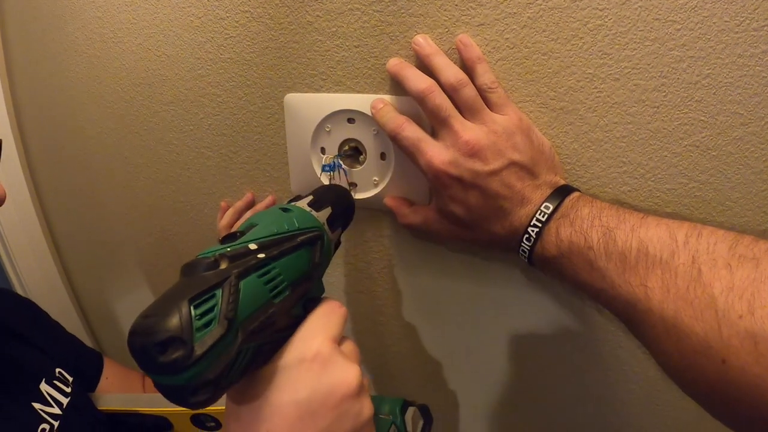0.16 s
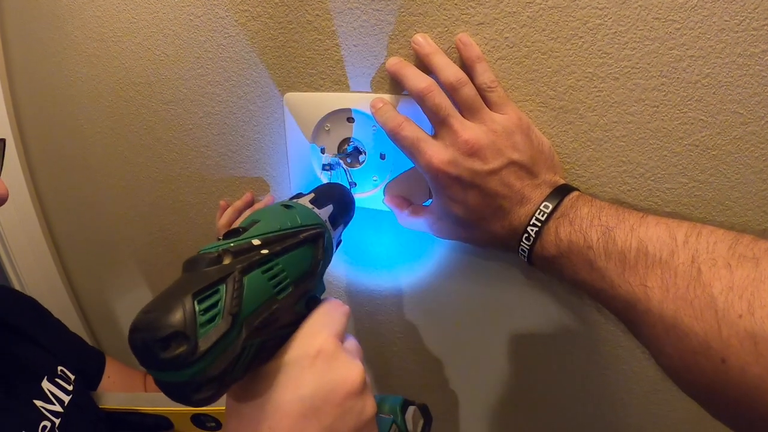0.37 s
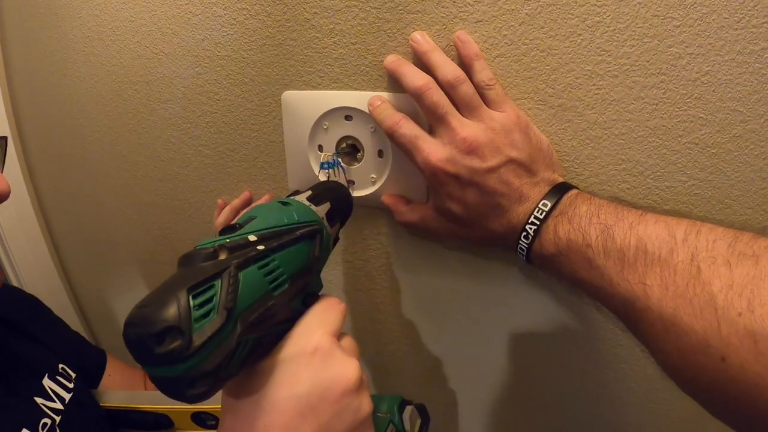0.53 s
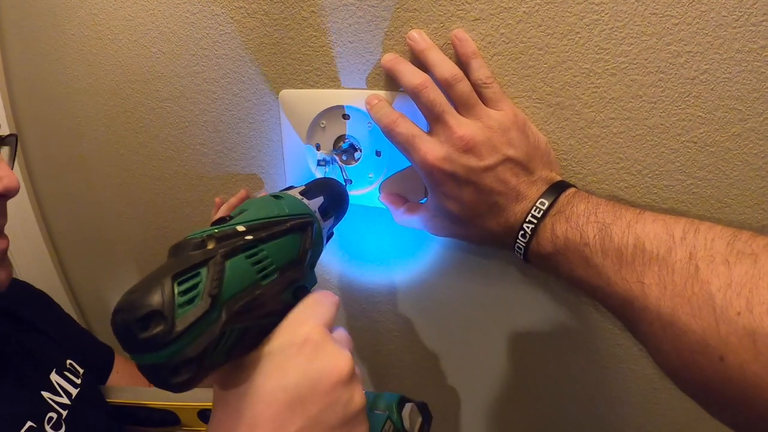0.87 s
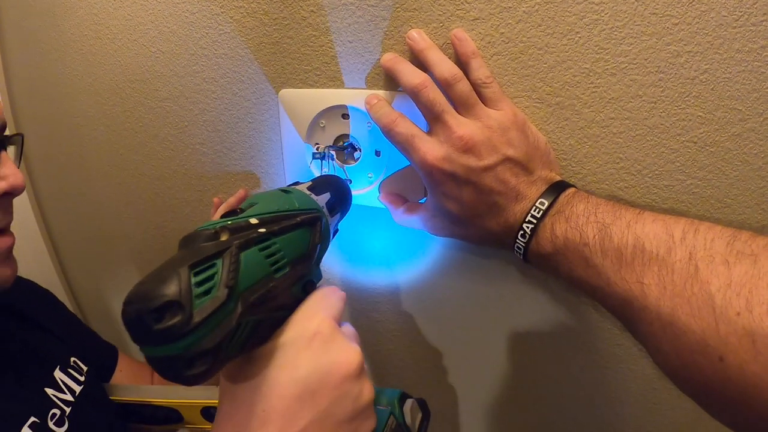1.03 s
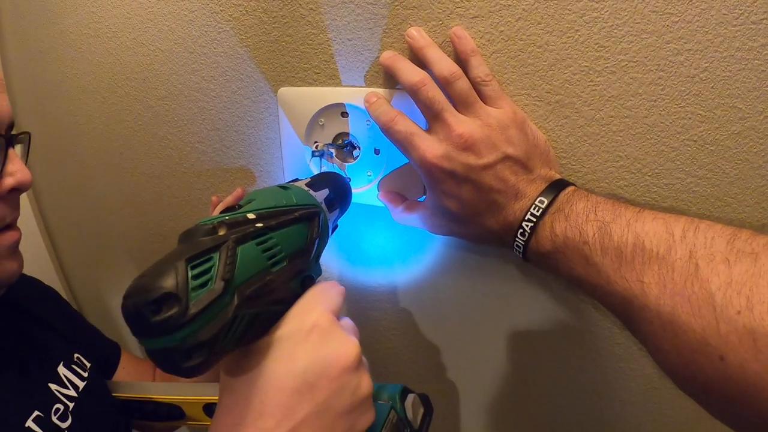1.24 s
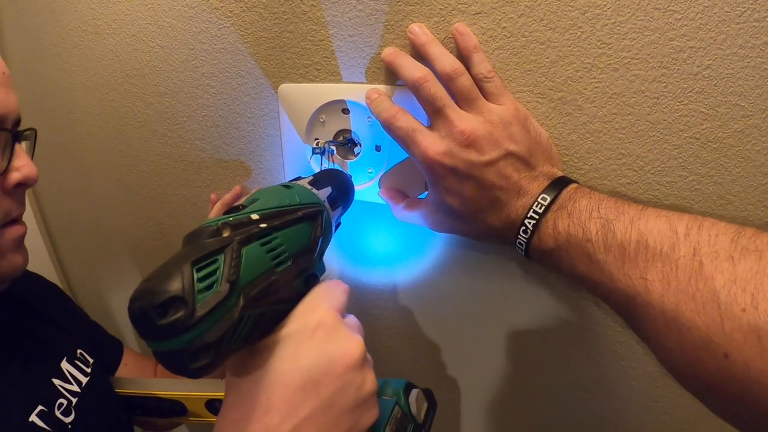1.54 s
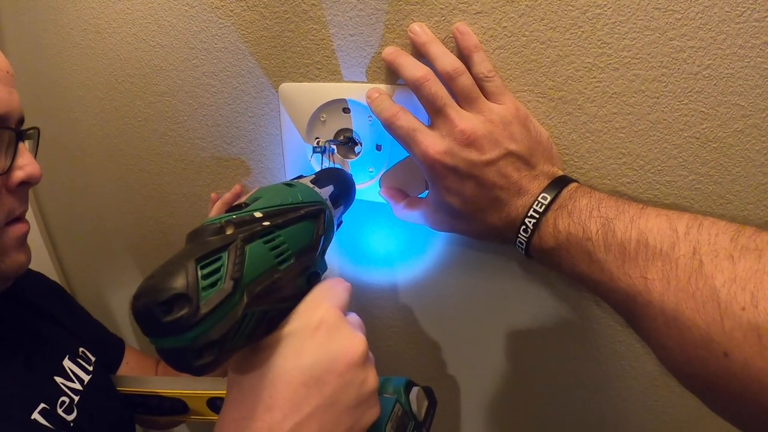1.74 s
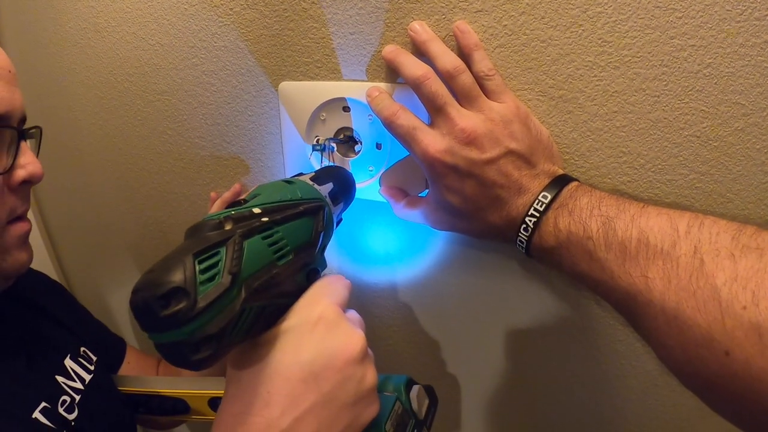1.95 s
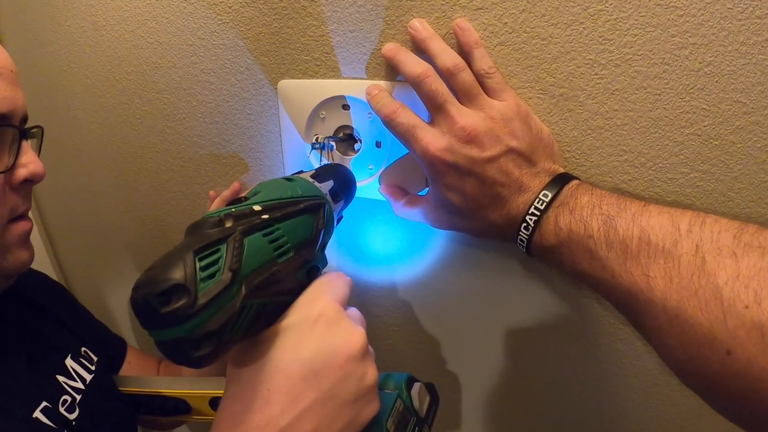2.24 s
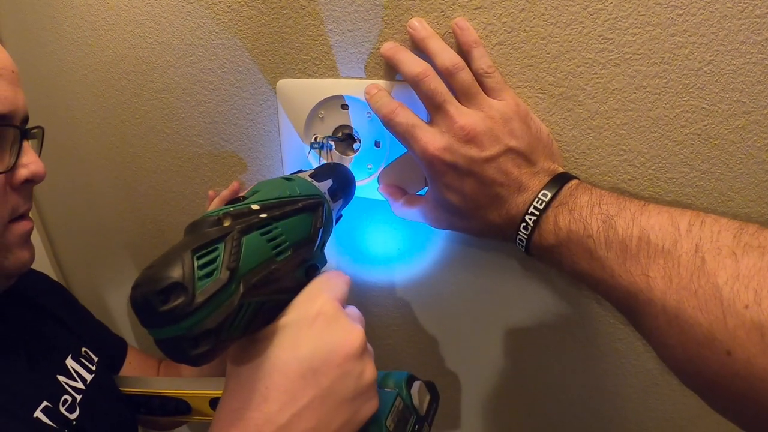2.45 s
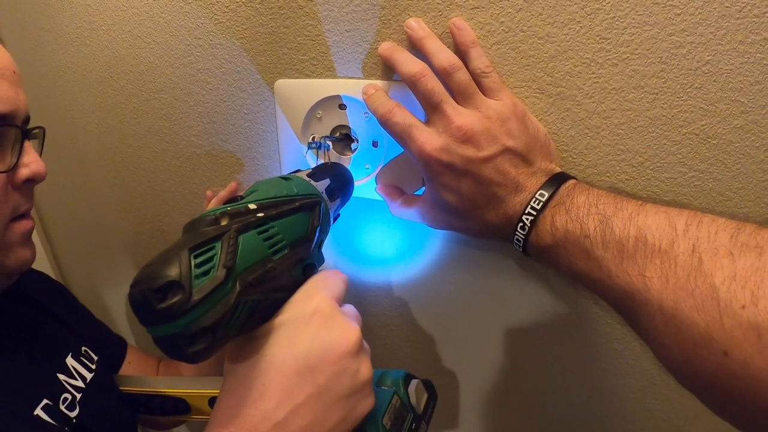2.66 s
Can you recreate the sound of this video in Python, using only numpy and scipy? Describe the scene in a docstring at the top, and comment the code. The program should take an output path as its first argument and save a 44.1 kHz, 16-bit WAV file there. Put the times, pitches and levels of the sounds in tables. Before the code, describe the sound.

Cordless drill whirrs briefly, crawls with knocking gears, then drives a screw at full speed.

```python
"""First comes the short whirr of a cordless drill, braked at once, in a small room.
A second pull lets the motor crawl: the speed control whistles, the gears knock once a turn and the
hollow wall booms. A third spins it up to full speed and drives a screw into a wall fixture.
The shaft hums, the gears rattle once a turn, the brushes hiss, and the even overtones grow
as the screw bites."""
import sys
import numpy as np
from scipy import signal
from scipy.fft import rfft, irfft, next_fast_len
from scipy.io import wavfile
from scipy.ndimage import map_coordinates

SR = 44100
rng = np.random.default_rng(int(sys.argv[2]) if len(sys.argv) > 2 else 0)


def to_wav(sig):
    """Store sig (one row per channel, or 1-D mono) as 16-bit WAV at the path in sys.argv[1].

    Samples outside -1..1 are clipped; the rate is SR.
    """
    pcm = np.clip(np.atleast_2d(sig), -1, 1) * 32767
    pcm = np.round(pcm).astype(np.int16)
    wavfile.write(sys.argv[1], SR, pcm.T)  # frames by channels


N = 123479


def amp(db):
    """Decibels to gain."""
    return 10 ** (np.asarray(db) / 20)


def unit(x):
    """Scale to rms 1."""
    return x / np.sqrt(np.mean(x ** 2) + 1e-20)


def along(points, hz):
    """Read (frequency, value) points on a log axis."""
    f, v = np.transpose(points)
    return np.interp(np.log(hz + 1), np.log(f + 1), v)


def clock():
    """Time of every sample."""
    return np.arange(N) / SR


def curves(rows):
    """One automation curve for each column after the time."""
    times, *columns = np.transpose(rows)
    return [np.interp(clock(), times, column) for column in columns]


def during(start, end, edge=0.0021):
    """A soft gate."""
    return np.clip(np.minimum(clock() - start, end - clock()) / edge + 1, 0, 1)


def decays(hits, t60):
    """Envelope of sharp hits (time [s], level [dB])."""
    t = clock()
    return sum((t >= start) * amp(db - 60 * np.abs(t - start) / t60) for start, db in hits)


def wobble(rate):
    """Smooth random modulation, rate knots a second."""
    return map_coordinates(rng.standard_normal(int(N * rate / SR) + 4), [clock() * rate])


def filtered(x, response):
    """Apply a frequency response to x."""
    size = next_fast_len(N + SR // 2)
    return irfft(rfft(x, size) * response(np.fft.rfftfreq(size, 1 / SR)), size)[..., :N]


def turned(hz):
    """Radians turned at a changing speed."""
    return 2 * np.pi * np.cumsum(hz) / SR


def partial(angle, order, scatter_rad=1.1):
    """One shaft order, its phase straying from one pulse a turn; high ones differ between the ears."""
    spread = np.array([[1], [-1]]) * rng.normal(0, 0.023) * order
    return np.sqrt(2) * np.cos(order * angle + rng.normal(0, scatter_rad) + spread)


# Stereo image of the noise layers (frequency [Hz], left-right correlation [0-1])
NOISE_CORRELATION = [(400, 1), (1400, 1), (2800, 0.84), (5500, 0.77), (11000, 0.54)]
def noise(spectrum):
    """Coloured stereo noise of rms near 1, wider toward the treble."""
    def mid_side(hz):
        width = np.arccos(np.clip(along(NOISE_CORRELATION, hz), -1, 1)) / 2
        return amp(along(spectrum, hz)) * [np.cos(width), np.sin(width)]
    mid, side = filtered(rng.standard_normal((2, N)), mid_side)
    return np.array([mid + side, mid - side]) / np.std(mid)


# Room tone colour (frequency [Hz], relative level [dB])
ROOM_TONE_EQ = [(120, -8), (400, -30), (1500, -33), (16000, -66)]
def room_tone():
    """A faint, dark bed of steady noise."""
    return amp(-54.5) * noise(ROOM_TONE_EQ)


# Reverb decay (frequency [Hz], t60 [s])
ROOM_DECAY = [(200, 0.5), (1500, 0.41), (4000, 0.47), (10000, 0.24)]
def room_reverb(x):
    """A small room whose treble dies first."""
    hz, t, bands = signal.stft(rng.standard_normal((2, SR // 2)), SR, nperseg=256)
    fade = amp(-60 * t / along(ROOM_DECAY, hz)[:, None])
    tail = signal.istft(bands * fade, SR, nperseg=256)[1]
    return signal.fftconvolve(x, tail / np.linalg.norm(tail[0]), axes=1)[:, :N]


# Envelopes of the wall's boom and the sub beneath it (time [s], level [dB])
SHUDDER_LEVEL = [(0, -25), (.15, -24.5), (.21, -35.5), (.32, -52.5), (.415, -64), (.44, -24.5),
                 (.64, -20.5), (.7, -30), (.8, -46), (.9, -55), (.93, -12), (1.1, -29.5), (1.5, -38.5),
                 (2.8, -37)]
SUB_LEVEL = [(.4, -45), (.55, -21), (.68, -24), (.8, -41.5), (1.0, -34), (1.17, -32), (1.5, -56),
             (2.8, -53)]
# Their colours (frequency [Hz], relative level [dB])
SHUDDER_EQ = [(35, -8), (68, -4), (92, -2), (120, 15.5), (150, 0), (200, 7), (270, -9.5), (335, -2.5),
              (400, -15), (480, -21.5), (600, -20), (1200, -31), (4000, -120)]
SUB_EQ = [(20, 3), (45, -1), (65, -1), (400, -120)]
def wall_rumble():
    """The wall shudders under the bit, with a deep rumble as the drill is pushed."""
    shudder = amp(curves(SHUDDER_LEVEL)[0]) * noise(SHUDDER_EQ)
    sub = amp(curves(SUB_LEVEL)[0]) * noise(SUB_EQ)
    return shudder + sub


# Trigger clicks (time [s], level [dB])
TRIGGER_HITS = [(.2005, -44), (.4235, -40), (.718, -61), (.855, -57)]
# Click colour (frequency [Hz], relative level [dB])
TRIGGER_EQ = [(500, -17), (3000, -4), (7000, -7), (9000, 1), (11000, -25), (15000, -22)]
def trigger():
    """The trigger gives tiny, bright clicks."""
    return noise(TRIGGER_EQ) * decays(TRIGGER_HITS, t60=0.013)


# Speed control chirps (start [s], length [s], pitch [Hz], level [dB])
WHISTLE_CUES = [(0, .028, 6500, -40), (.406, .011, 5650, -61), (.426, .074, 6040, -54),
                (.507, .075, 7020, -59), (.555, .04, 6000, -58), (.876, .012, 5650, -61),
                (.893, .024, 6520, -52)]
def speed_control():
    """The speed control whistles unsteadily while the trigger is half pressed."""
    whistle = np.zeros((2, N))
    for start, length, hz, db in WHISTLE_CUES:
        envelope = amp(db + 3 * wobble(400)) * during(start, start + length, edge=.005)
        whistle += envelope * partial(turned(hz + 90 * wobble(2500)), 1)
    return whistle


# Gear knocks, then the motor's kick as the spin-up starts (time [s], clack level [dB], wall thump level [dB])
KNOCK_HITS = [(.432, -26, -15.5), (.4845, -26.5, -15.5), (.5235, -23, -13.5), (.557, -21.5, -14),
              (.5915, -22.5, -16), (.635, -21.5, -17), (.915, -17, -16)]
# Hollow wall modes (frequency [Hz], level relative to the thump [dB], t60 [s])
WALL_MODES = [(91.6, -1, 0.3), (118.7, 5, 0.24), (178.5, 0.5, 0.13), (203, -17, 0.16), (353, -12.5, 0.043),
              (486, -21, 0.14)]
# Clack colour (frequency [Hz], relative level [dB])
CLACK_EQ = [(200, 10.5), (700, -0.5), (900, -3.5), (1500, -0.5), (2150, -2.5), (2500, -20), (5000, -41),
            (12000, -65)]
def gear_knocks(wall_attack_s=0.0048):
    """At low speed the gears clack once a turn, the motor kicks as it spins up, and each knock rings the hollow
    wall."""
    clack = noise(CLACK_EQ) * decays([hit[:2] for hit in KNOCK_HITS], t60=.024)
    ring = np.zeros(N)
    for start, _, thump_db in KNOCK_HITS:
        t = np.maximum(clock() - start, 0)
        attack = 1 - np.exp(-t / wall_attack_s)
        for hz, db, t60 in WALL_MODES:
            envelope = attack * amp(thump_db + db - 60 * t / t60)
            ring -= envelope * np.sin(2 * np.pi * hz * t + rng.normal(0, .2))
    return clack, ring


# Rustle envelope, last level held (time [s], level [dB])
GRIP_LEVEL = [(.62, -79), (.7, -56), (.82, -63), (.86, -52.5), (.95, -50)]
def grip():
    """The grip rustles faintly ahead of the long pull, in the same colour as the clack."""
    return amp(curves(GRIP_LEVEL)[0]) * noise(CLACK_EQ)


# Scratch envelope (time [s], level [dB])
SCRATCH_LEVEL = [(.418, -59), (.428, -48), (.46, -43), (.53, -40.5), (.57, -38), (.636, -43), (.69, -71)]
# Scratch colour (frequency [Hz], relative level [dB])
SCRATCH_EQ = [(300, -10), (800, 6), (1400, 2), (2500, -3), (3500, -0.5), (5600, -7), (7000, -7),
              (8000, -12.5), (9500, -6.5), (10600, -34), (15000, -29)]
def brush_scratch():
    """The brushes scratch while the motor barely turns."""
    gate = during(SCRATCH_LEVEL[0][0], SCRATCH_LEVEL[-1][0])
    grain = unit(amp(2.2 * wobble(700) + 0.84 * wobble(89.4)))
    return gate * amp(curves(SCRATCH_LEVEL)[0]) * grain * noise(SCRATCH_EQ)


def repeat_each_turn(x, angle, share=.28, top_hz=5500):
    """The same teeth and bars meet on every turn, so some noise repeats and gathers round the orders."""
    turn_ago = np.rint(np.interp(angle - 2 * np.pi, angle, np.arange(N))).astype(int)
    dulled = filtered(x, lambda hz: 1 / np.sqrt(1 + (hz / top_hz) ** 10))
    return unit(x + share * dulled[:, turn_ago])


# Gear and brush colours (frequency [Hz], relative level [dB])
GEAR_EQ = [(250, -4.5), (480, -3.5), (730, -6), (1050, 4), (1550, 3.5), (2050, 0.5), (2400, -8.5),
           (4000, -16.5), (13000, -63)]
BRUSH_EQ = [(400, -5.5), (1500, -49), (2500, -3), (3500, 2), (3900, -1.5), (4280, 4.5), (4800, -1.5),
            (6300, 0.5), (7400, -2.5), (7950, -9), (8800, -5), (10200, -14.5), (12500, -18), (15500, -29)]
def friction(angle, rattle_db, hiss_db):
    """Gears rattle once a turn; the brushes hiss in fine grains."""
    rattle = repeat_each_turn(noise(GEAR_EQ), angle)
    pulse = unit(amp(2 * np.cos(angle) + np.cos(2 * angle)))
    hiss = repeat_each_turn(noise(BRUSH_EQ), angle)
    grain = unit(amp(1.1 * np.sin(angle) + 0.6 * wobble(800) + 0.55 * wobble(40.14)))
    return amp(rattle_db) * pulse * rattle + amp(hiss_db) * grain * hiss


# Opening burst (time [s], motor speed [Hz], hum [dB], rattle [dB], hiss [dB])
SHORT_PULL = [(0, 97.7, -13.5, -34, -32), (0.036, 104, -15, -26.5, -34), (0.074, 103.9, -11.5, -33.5, -36),
              (0.104, 91, -14, -35.5, -36), (0.126, 88, -18, -51, -62), (.16, 40.3, -42, -75, -78)]
# Its hum (shaft order [x speed], relative level [dB])
SHORT_HUM_ORDERS = [(1, 2), (2, -1), (3, -22), (4, -20.5), (5, -23)]
def short_pull():
    """The motor at about a third of full speed, then braked: hum and friction."""
    speed, hum_db, rattle_db, hiss_db = curves(SHORT_PULL)
    angle = turned(speed)
    gate = during(0, SHORT_PULL[-1][0])
    hum = unit(sum(amp(db) * partial(angle, order) for order, db in SHORT_HUM_ORDERS))
    return gate * amp(hum_db) * hum, gate * friction(angle, rattle_db, hiss_db)


# Gear tones (shaft order [x speed], relative level [dB])
GEAR_TONES = [(1 / 14, -27.5), (3 / 7, -35), (1 / 2, -33.5), (6 / 7, -28.5), (3 / 2, -36.5)]
def shaft_hum(angle, speed, wall_lag_s=.017, low_cut_hz=64):
    """Drifting gear tones and a fundamental that swells late through the wall, which radiates few lows."""
    def late(curve):
        return np.interp(clock() - wall_lag_s, clock(), curve)
    hum = partial(late(angle), 1) / np.sqrt(1 + (low_cut_hz / late(speed)) ** 6)
    for order, db in GEAR_TONES:
        hum += amp(db + 0.4 * wobble(20)) * partial(angle + 2.53 * wobble(10), order)
    return hum


# Peak and dip that the overtones sweep through (centre [Hz], half width [Hz], gain [dB])
SWEEP_EQ = [(440, 150, 2), (716, 200, -7.5)]
def sweep_db(hz):
    """A peak and a dip colour each overtone that sweeps through them."""
    return sum(db * np.exp(-((hz - centre) / width) ** 2) for centre, width, db in SWEEP_EQ)


# Buzz overtones (shaft order [x speed], relative level turning freely [dB], the same biting [dB])
BUZZ_ORDERS = [(2, -28.5, -16.5), (3, -23, -18), (4, -27.5, -20), (5, -25, -25.5), (6, -27.5, -18.5),
               (7, -24.5, -26), (8, -35, -35), (10, -35, -32), (11, -40, -40), (12, -37.5, -33.5),
               (13, -41, -34.5), (15, -38, -33), (16, -31, -39)]
def motor_buzz(angle, speed, bite_midpoint_s=1.89, bite_length_s=0.6):
    """Overtones of the jittery shaft; as the screw bites, the even ones grow and the flutter eases."""
    bite = np.clip((clock() - bite_midpoint_s) / bite_length_s + .5, 0, 1)
    shaky_angle = angle + .0175 * (wobble(76) + wobble(300))
    buzz = np.zeros((2, N))
    for order, free_db, biting_db in BUZZ_ORDERS:
        level_db = sweep_db(order * speed) + free_db + bite * (biting_db - free_db)
        flutter_db = 1.9 * (1 - .5 * bite) * wobble(22.14)
        swell_db = .6 * wobble(5.48)
        tone = partial(shaky_angle + 0.084 * wobble(35.02), order)
        buzz += amp(level_db + flutter_db + swell_db) * tone
    return buzz


# Rev-up (time [s], motor speed [Hz], hum [dB], rattle [dB], hiss [dB])
REV_UP = [(.882, 10.6, -36, -63, -61), (.917, 69.3, -16, -37.5, -32), (.935, 128, -32, -27.5, -28.5),
          (.965, 227, -7, -25.5, -29.5), (0.984, 212, -27, -28, -28.5), (1.005, 255, -14, -22, -28.5),
          (1.045, 272, -15.5, -26.5, -29), (1.085, 280, -11.5, -27, -28)]
# Pitch drift at full speed (time [s], motor speed [Hz])
DRIVE_SPEED = [(1.12, 280.1), (1.36, 281.3), (1.6, 282.1), (1.8, 280.8), (1.86, 284.3), (1.96, 283.1),
               (2.04, 281.4), (2.18, 277.5), (2.25, 280.5), (2.44, 280.7), (2.51, 278.3), (2.62, 278.6),
               (2.72, 280.1)]
# Mix at full speed (time [s], hum [dB], rattle [dB], hiss [dB])
DRIVE_LEVELS = [(1.15, -11.5, -27.5, -28.5), (1.7, -11.5, -28.5, -29.5), (2.25, -11.5, -30, -30),
                (2.8, -10.5, -30, -30.5)]
def long_pull(buzz_boost_db=17.5):
    """The motor spins up and drives the screw: hum, and a buzz that rides the level of the rattle."""
    speed, = curves([row[:2] for row in REV_UP] + list(DRIVE_SPEED))
    hum_db, rattle_db, hiss_db = curves([(row[0], *row[2:]) for row in REV_UP] + DRIVE_LEVELS)
    angle = turned(speed)
    gate = during(REV_UP[0][0], N / SR)
    hum = amp(hum_db) * shaft_hum(angle, speed)
    buzz = amp(rattle_db + buzz_boost_db) * motor_buzz(angle, speed)
    return gate * hum, gate * (buzz + friction(angle, rattle_db, hiss_db))


def scene():
    """The bright layers feed the reverb; hum, wall and room tone stay dry."""
    short_hum, short_rasp = short_pull()
    long_hum, long_rasp = long_pull()
    clack, wall_ring = gear_knocks()
    bright = short_rasp + long_rasp + clack + brush_scratch() + speed_control() + trigger() + grip()
    low = short_hum + long_hum + wall_ring + wall_rumble()
    return room_tone() + low + bright + amp(-15.5) * room_reverb(bright)


# Stereo tilt (frequency [Hz], left minus right level [dB])
STEREO_TILT = [(300, 1.05), (700, .5), (2800, 2.3), (5000, 1.8), (8500, -2.8), (15000, -4.5)]
# Stereo phase (frequency [Hz], left minus right phase [rad])
STEREO_PHASE = [(120, -0.095), (280, -0.2), (1400, -0.44), (4000, -0.56), (7500, -1.14)]
def record(dry, top_hz=15700):
    """Left and right differ in colour and phase and share a high cut."""
    sides = np.array([[.5], [-.5]])
    def response(hz):
        gain = amp(along(STEREO_TILT, hz) * sides)
        phase = along(STEREO_PHASE, hz) * sides
        return gain * np.exp(1j * phase) * (hz < top_hz)
    return filtered(dry, response)


dry = scene()
out = record(dry)
to_wav(out)
```